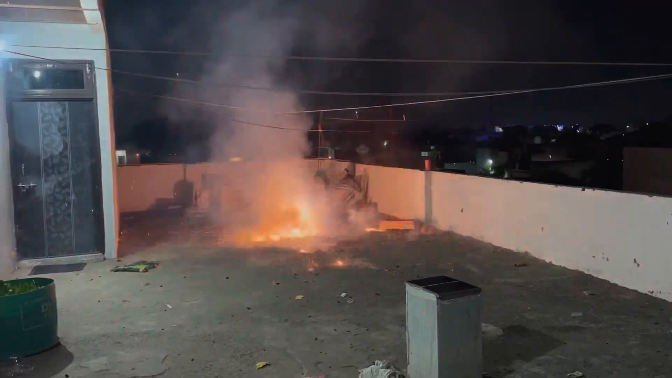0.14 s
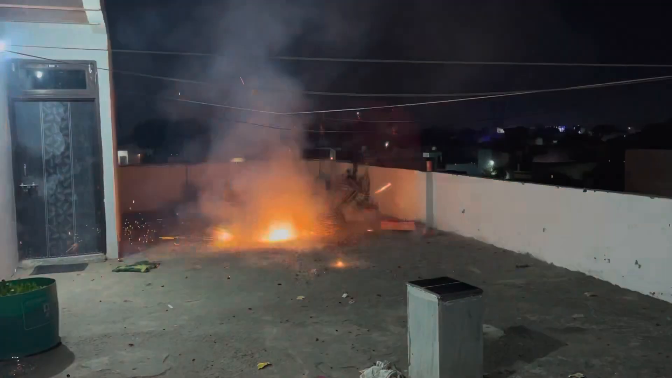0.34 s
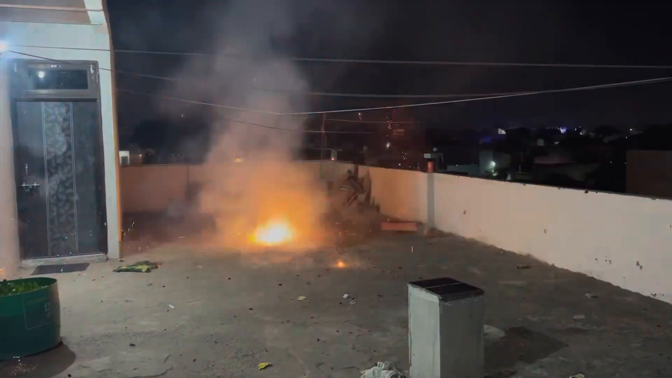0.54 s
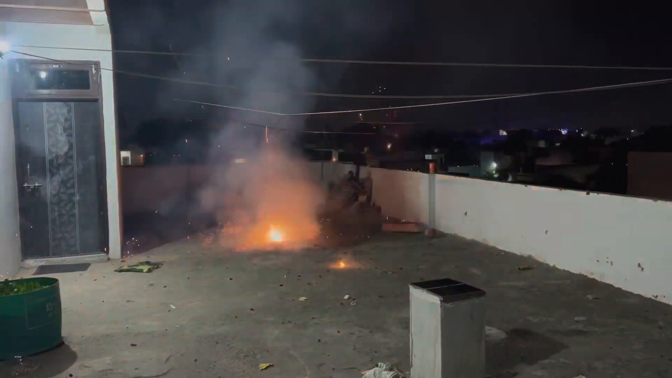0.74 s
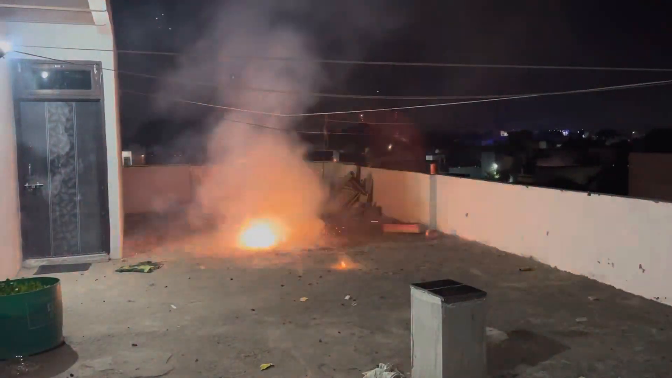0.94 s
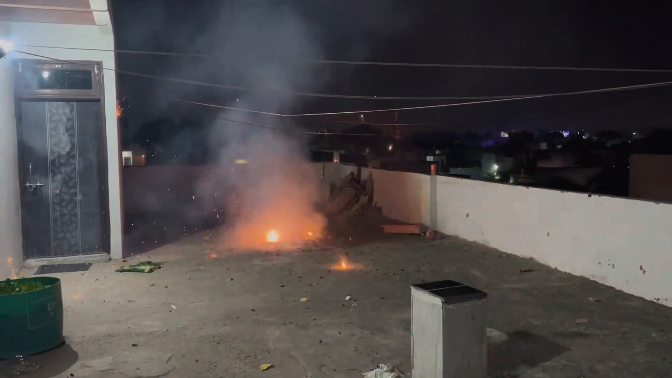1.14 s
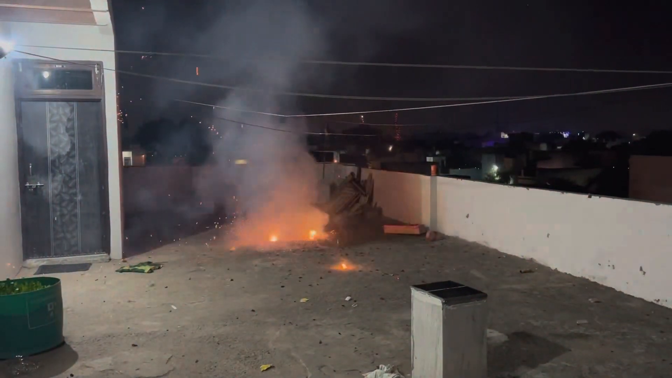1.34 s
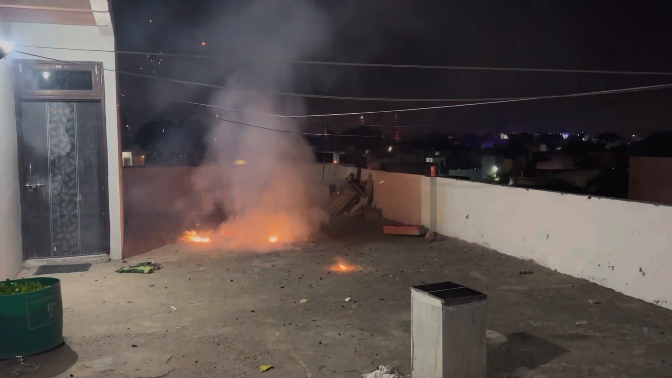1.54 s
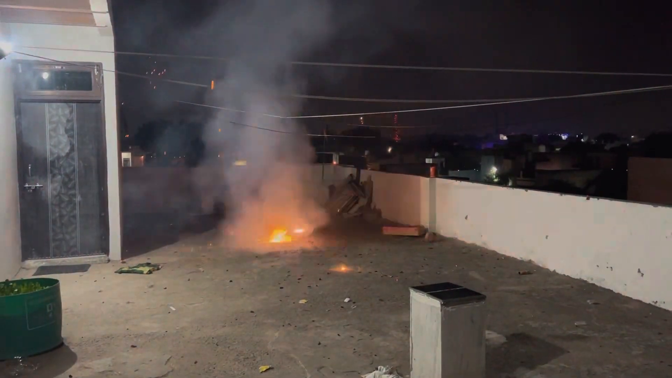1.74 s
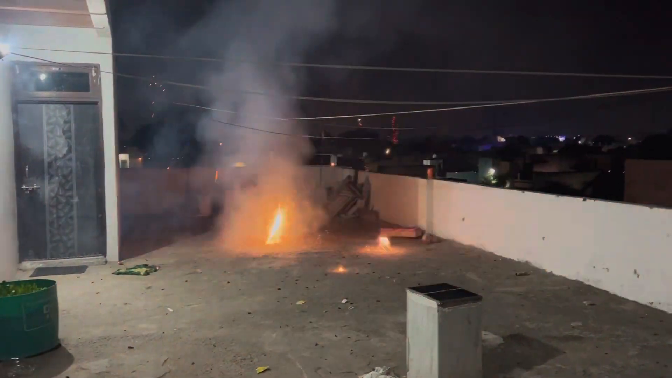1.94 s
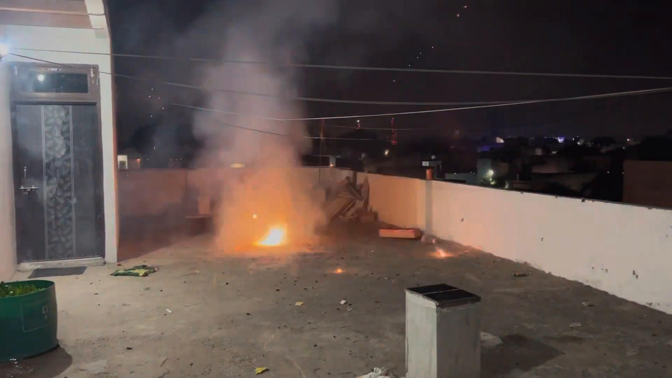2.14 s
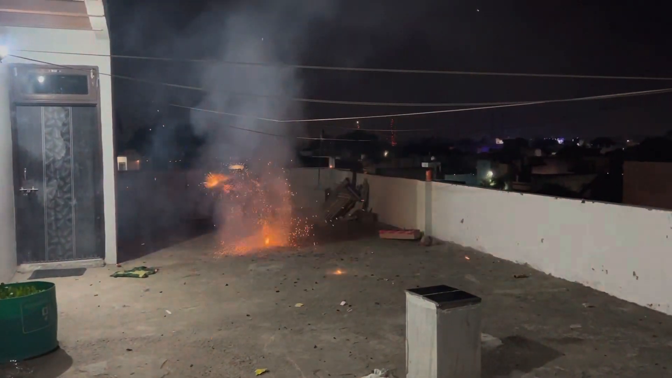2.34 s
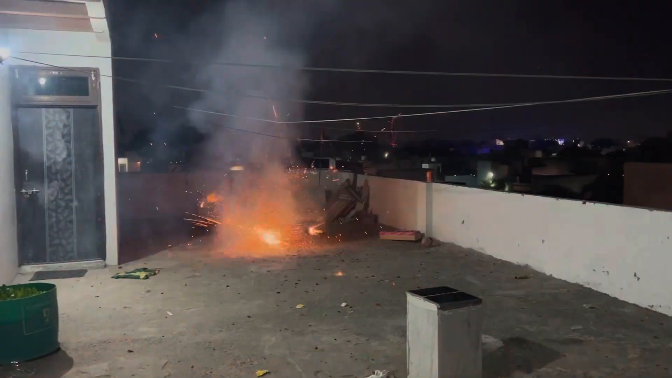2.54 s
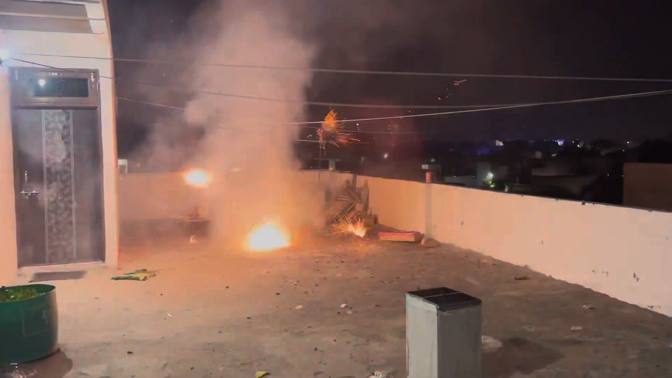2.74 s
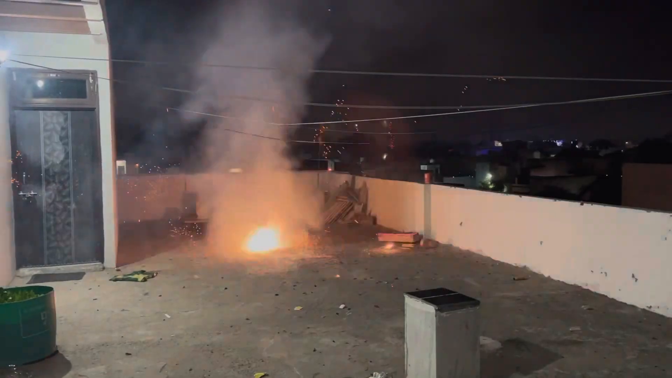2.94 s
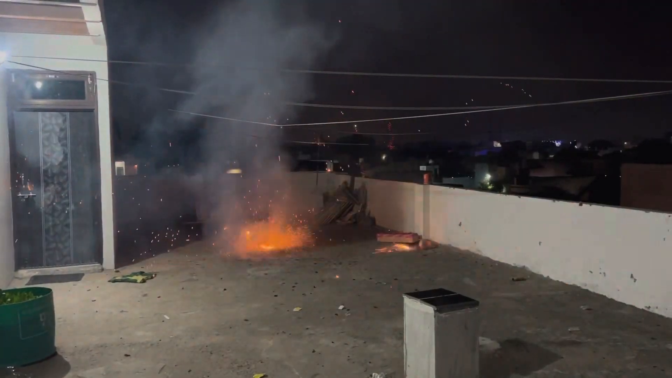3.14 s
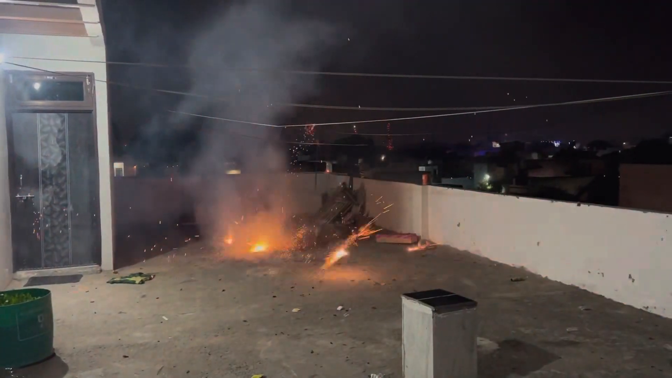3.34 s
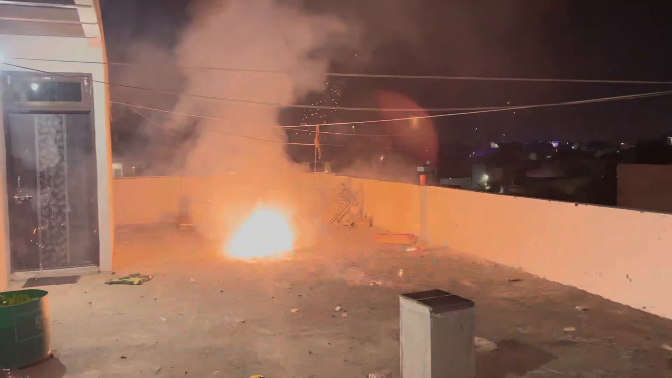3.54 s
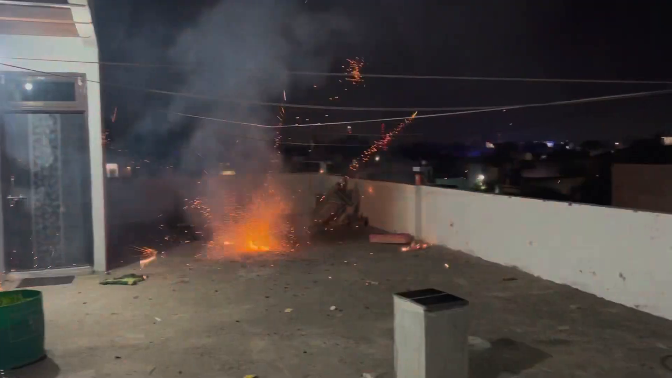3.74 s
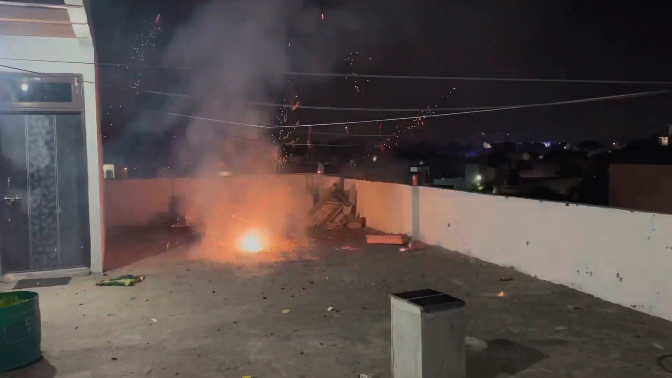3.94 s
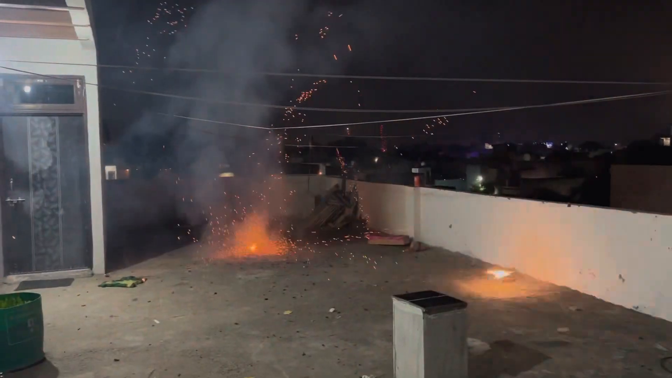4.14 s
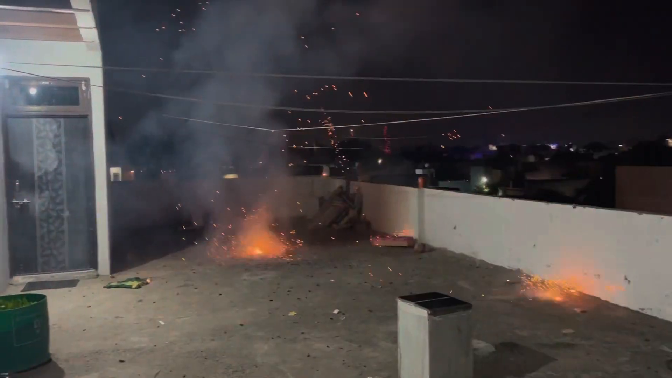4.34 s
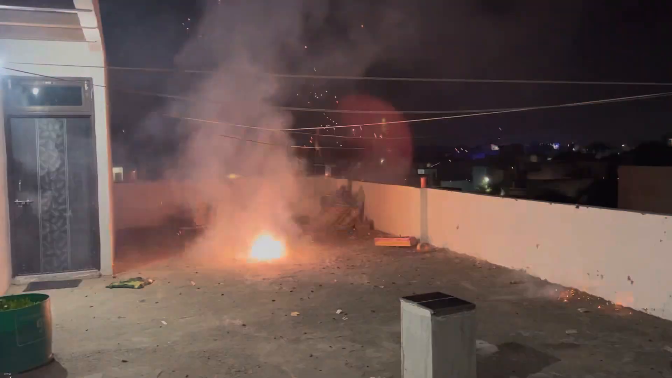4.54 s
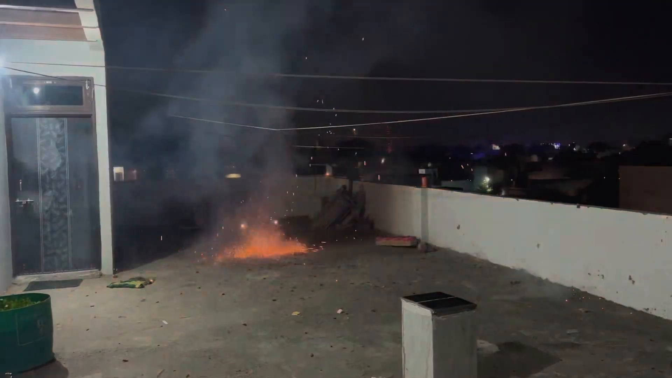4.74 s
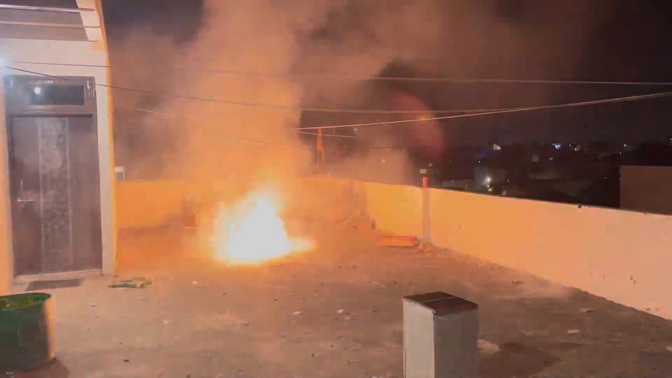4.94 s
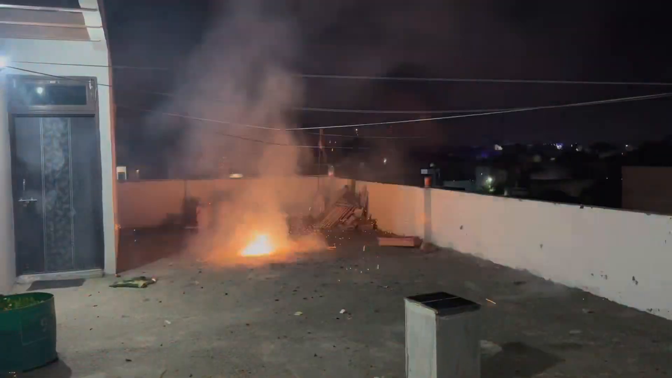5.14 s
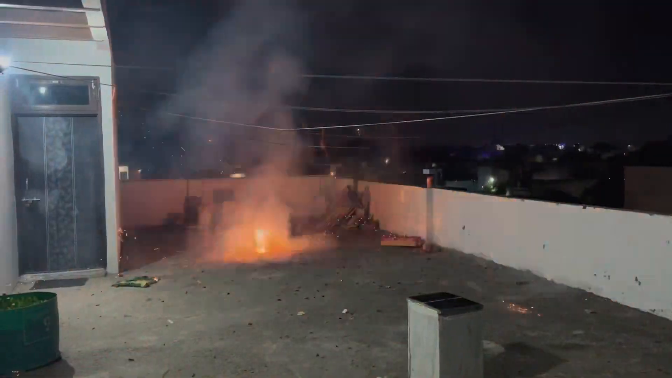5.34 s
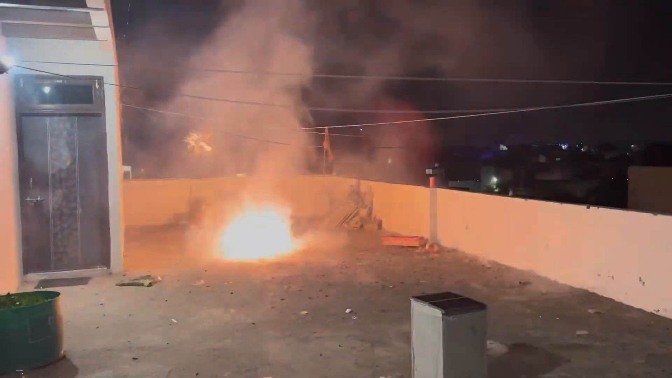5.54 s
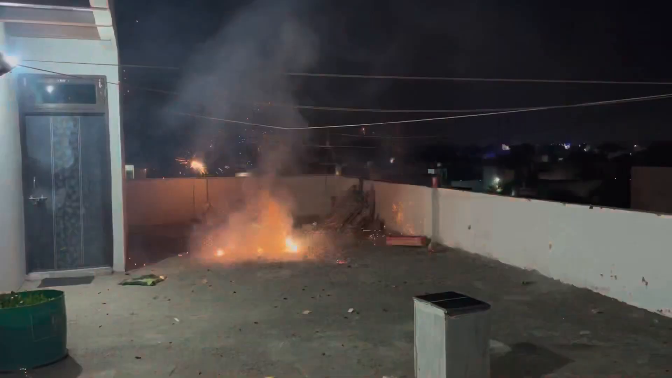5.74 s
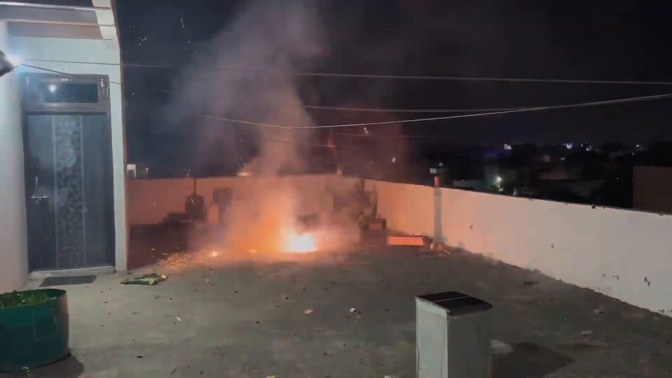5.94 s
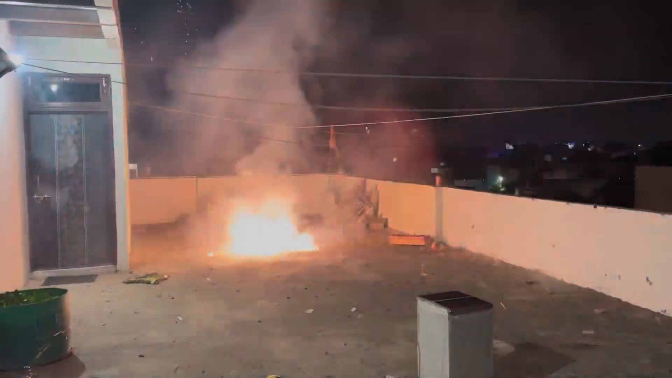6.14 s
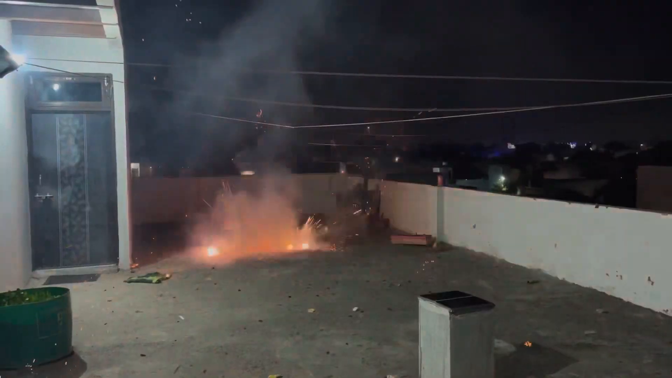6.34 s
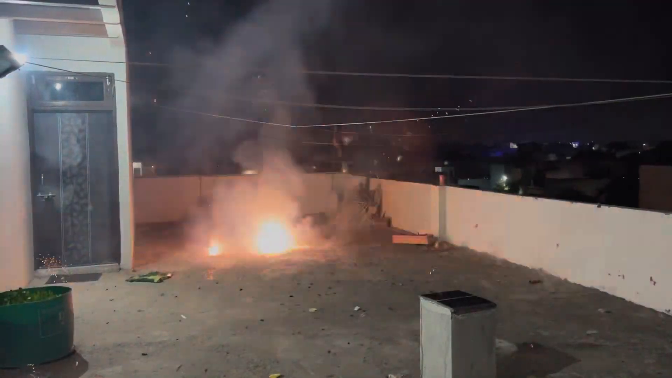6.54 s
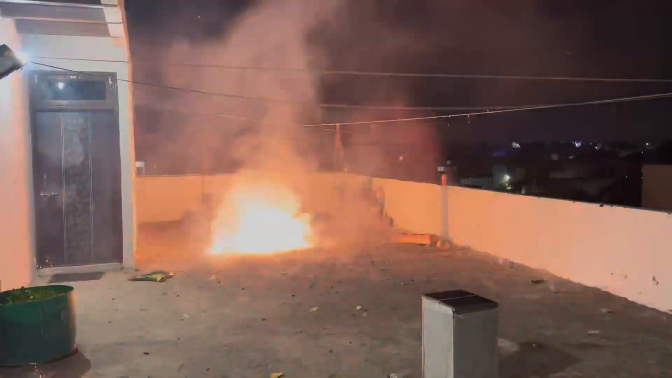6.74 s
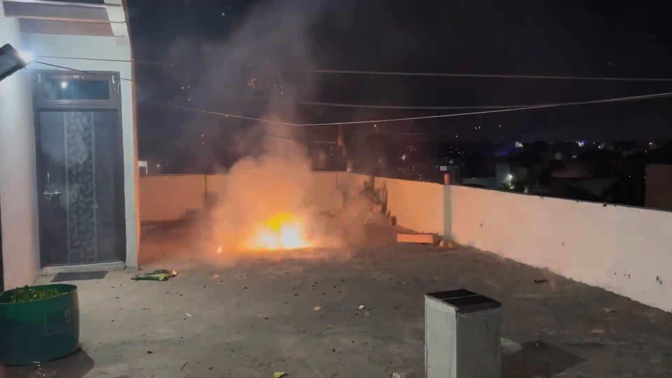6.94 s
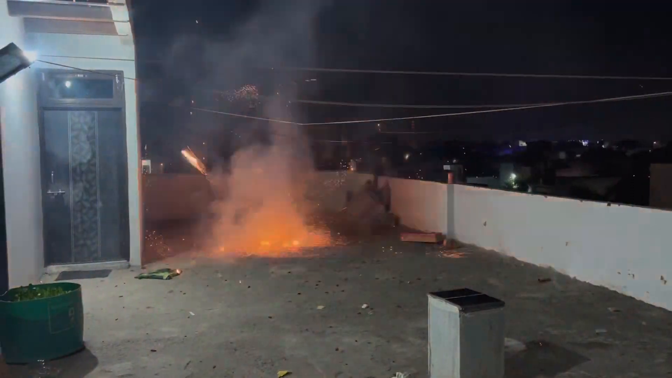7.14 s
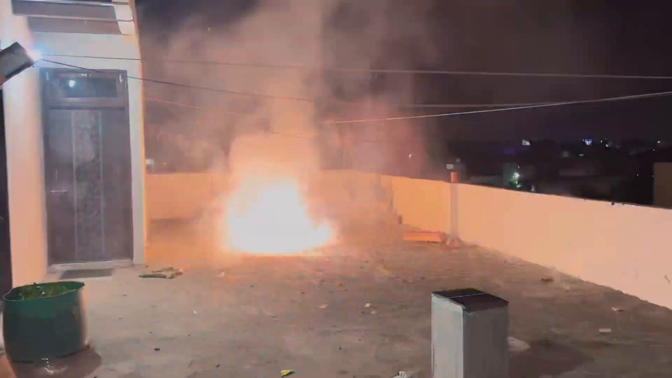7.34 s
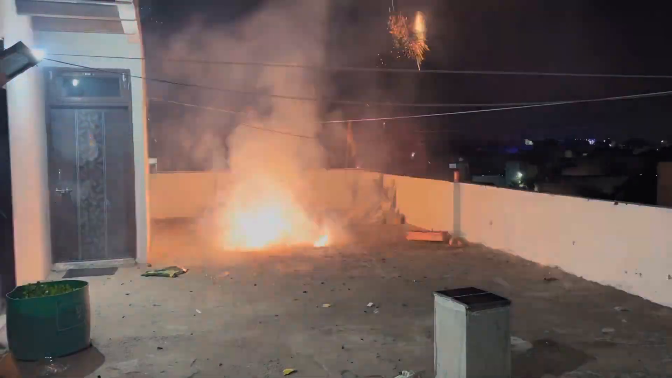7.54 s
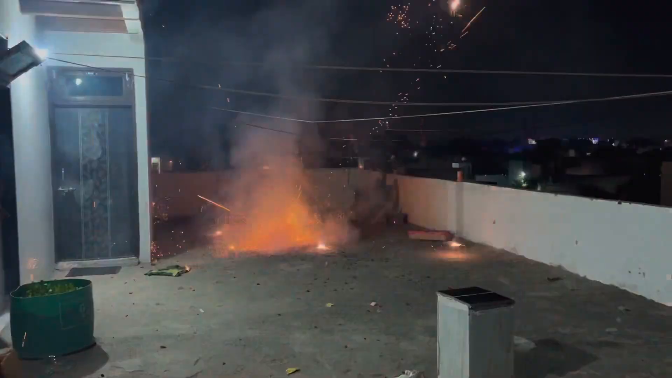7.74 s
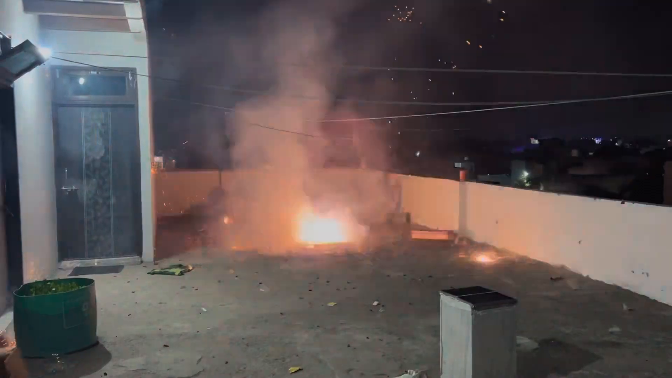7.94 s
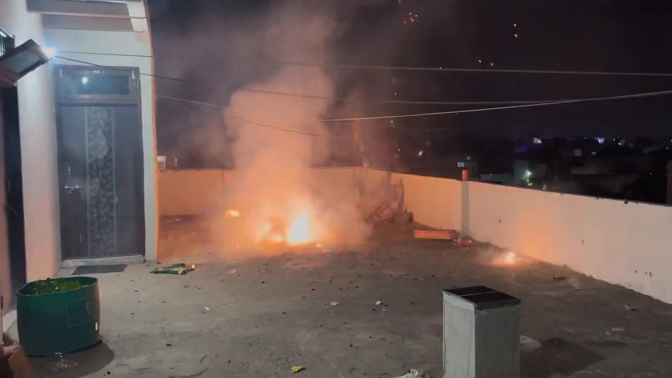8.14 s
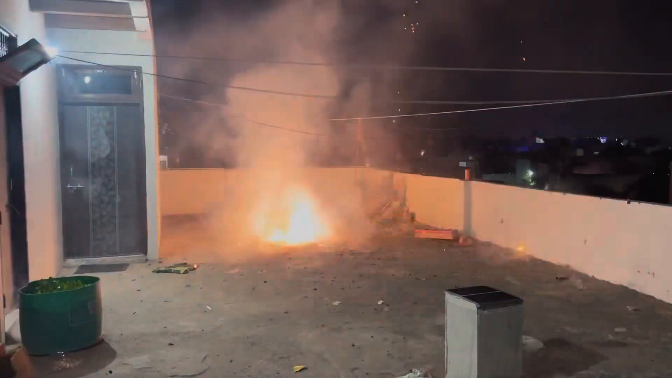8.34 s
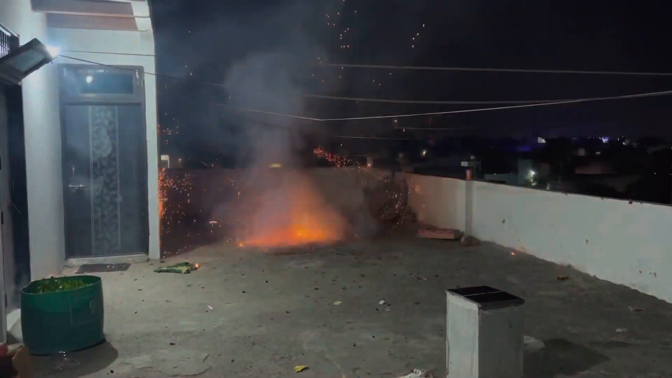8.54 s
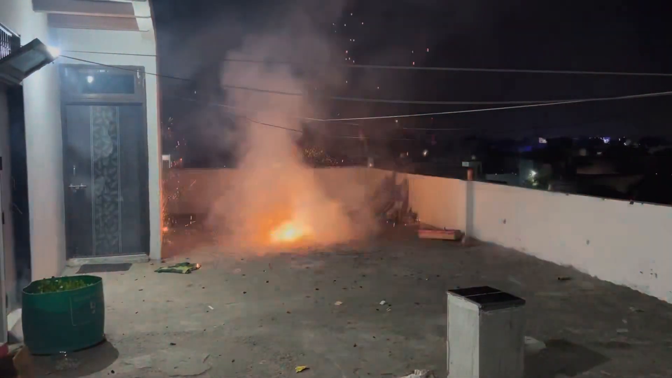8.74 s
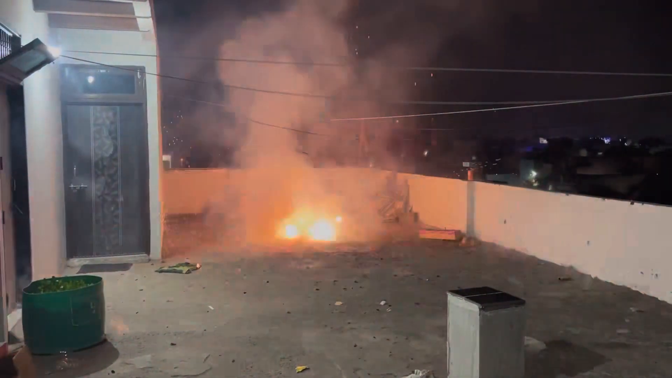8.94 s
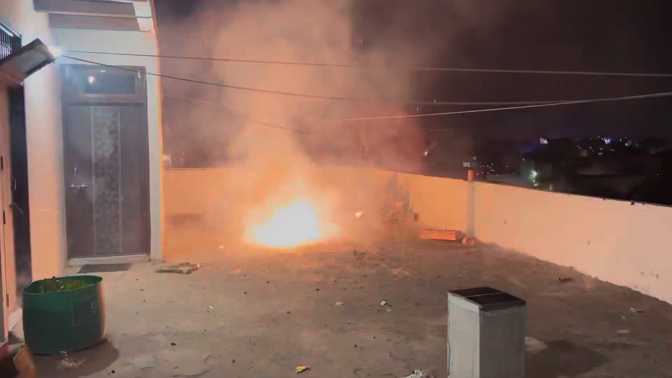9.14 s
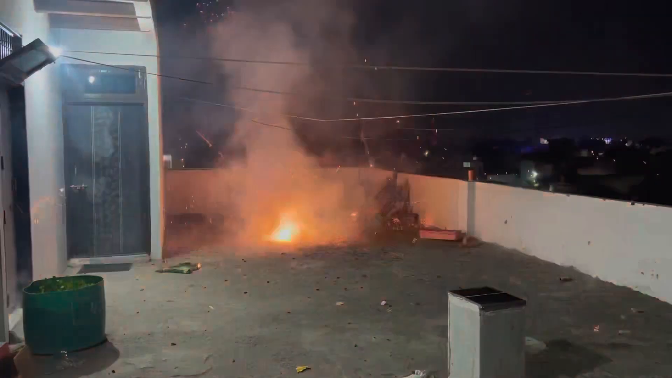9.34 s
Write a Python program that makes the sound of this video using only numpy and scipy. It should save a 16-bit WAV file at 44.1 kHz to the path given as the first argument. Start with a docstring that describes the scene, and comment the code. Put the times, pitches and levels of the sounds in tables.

```python
"""A thin whistle and the roll of earlier bangs, then a long string of firecrackers cracks away at night.
The place is a walled concrete roof terrace above a humming town, the microphone a phone some metres off.
Each blast is a sharp shock that slaps off the parapets, rings between the walls and rolls over the roofs.
Sparks sizzle after the bangs, and one cracker only fizzes.
The phone smears the bass into a quick downward thump and overloads on the loud bangs."""
import sys
import numpy as np
from scipy import signal
from scipy.fft import rfft, irfft, next_fast_len
from scipy.io import wavfile
from scipy.ndimage import uniform_filter1d, minimum_filter1d, map_coordinates

SR = 44100
rng = np.random.default_rng(int(sys.argv[2]) if len(sys.argv) > 2 else 0)


def store_pcm(level_fs):
    """Save levels as 16-bit WAV."""
    pcm = np.round(np.clip(level_fs, -1, 1) * 32767).astype(np.int16)
    wavfile.write(sys.argv[1], SR, np.atleast_2d(pcm).T)


N = 418068
SPAN = 32768  # samples in one bang with its ring
HZ = np.fft.rfftfreq(SPAN, 1 / SR)
AGE = np.arange(SPAN) / SR

# colour of the night air over the town: (frequency [Hz], level [dB])
TOWN_COLOUR = [(25, -30), (42, -2), (70, -1), (350, 7), (800, -9), (2500, -11), (6000, -22.5), (9500, -39),
               (13000, -23), (16000, -34)]
# colour of the sparks: (frequency [Hz], level [dB])
SPARK_COLOUR = [(300, -30), (2000, 13), (6000, 11), (9800, -10), (12500, 0), (16000, -14)]
# colour of flaring powder: (frequency [Hz], level [dB])
FIZZ_COLOUR = [(40, -15), (150, 16), (500, 3.5), (2500, -4), (6000, -8.0), (9800, -18.5),
               (12500, -11), (16000, -19)]
# colour of the ring between the walls: (frequency [Hz], level [dB])
RING_COLOUR = [(20, -14), (45, -10), (110, -0.5), (200, 0), (450, 9.5), (700, 4), (1100, 0.5), (2200, -2),
               (3500, -9), (5200, -11.5), (8000, -20.5), (14000, -27)]
# decay of that ring: (frequency [Hz], time to fall 60 dB [s])
RING_DECAY = [(50, 0.44), (170, 0.42), (380, 0.36), (900, 0.37), (3000, 0.33), (8000, 0.31), (15000, 0.3)]
# resonances of the terrace: (frequency [Hz], width [Hz], gain [dB])
TERRACE_MODES = [(188, 78, 7.5), (320.5, 10.5, 7.5), (385.2, 24, 7), (395, 44, 3)]
# first reflections, off the door wall and the parapets: (delay [s], level [dB])
WALL_SLAPS = [(.0023, -3.5), (.006, -1), (0.0107, -8)]
# peaks and dips that the nearby walls put into every blast: (frequency [Hz], width [Hz], gain [dB])
WALL_COMB = [(241.5, 71, 4.5), (742, 110, -3.5), (800, 89, 2.5), (1034, 200, 5.5), (1210, 66, 7.5),
             (1370, 130, -0.5), (1386, 30, 2), (2354, 52, 1), (2586, 175, -4.5)]
# colour of a blast: (frequency [Hz], level [dB])
BLAST_COLOUR = [(20, -28), (33, -4), (52, 13), (110, 9), (220, 11.5), (400, 9), (700, 2.5), (1300, -4),
                (2200, -4.5), (3500, -10), (5200, -18.5), (8000, -24.5), (14000, -26.5)]
# the crackers on the string, with boom, body and ring relative to the crack:
# (time [s], crack level [dB], boom [dB], hollow body [dB], terrace ring [dB])
CRACKERS = [(0.088, -29.5, -9, -9.5, -7), (0.196, -12, 1.0, -7, -2.5), (0.317, -17.0, 1, -2.0, -2.5),
            (0.346, -19.5, 2, 3.5, -10), (0.571, -38.5, 10, 8, -6), (0.612, -11, -20, -9.5, -5.0),
            (0.676, -23.5, 3, -3, -5.5), (0.708, -20, -15, -4.5, -9), (0.818, -28, -4, -6.5, 0),
            (0.896, -27.5, -15, -8.0, -4.0), (0.912, -20.5, -23, -5, -8), (0.941, -14.0, 7.5, 2.5, -5.5),
            (1.211, -27.5, 10, 4.5, -6.5), (1.731, -24, -3, -3.5, -10.5), (1.781, -27, 6, 1.5, -1.5),
            (1.856, -20, -3, -3.5, -7.5), (1.953, -30.0, 7, 8.5, -2.5), (2.072, -14.5, -11.0, -2, -5.5),
            (2.188, -19.5, -11, -8, -8), (2.214, -15.5, 6.5, 1.5, -3), (2.389, -14.5, -0.5, 1.5, 1.5),
            (2.537, -32, 8, 3.5, -0.5), (2.704, -26, -3, -5.5, -5.0), (2.741, -10.5, -2.5, -6, -4),
            (2.757, -14.0, -4, -1.5, -1.5), (2.852, -23, -5.0, 3, -8.5), (2.973, -16.0, -3, -10, -8.0),
            (3.1, -13.0, -0.5, -2, -8), (3.239, -11.0, 4, -3, -5.5), (3.38, -23.5, 2.5, 1.5, -5.5),
            (3.566, -13.0, 2.0, -6.5, 0.0), (3.66, -16, -0.5, -9, -1.5), (3.781, -9.5, -4.5, -7, -4.5),
            (3.907, -11.0, -5, -0.5, -5.5), (4.029, -12.5, -5, -3.5, -1), (4.051, -12.5, 14, -5.5, -6.5),
            (4.226, -16.0, -6.5, -13, -10.5), (4.271, -45, 5, -27, -2), (4.441, -12, 2, -3.5, -3.5),
            (4.496, -16.5, -17, 1, -4), (4.597, -16.5, 5, -5.5, -7.0), (4.626, -22.5, -20, -1, -6.5),
            (4.844, -12.5, 0, -5.5, -2.5), (4.977, -21.5, 9, -7.5, -6.0), (5.025, -12, -6, -2.5, -4.5),
            (5.051, -20, 10, -15, -3), (5.159, -17.0, -6.0, -2, -5), (5.2, -28, -5, 2.5, 6),
            (5.248, -17, 8, 4, -6), (5.301, -12, 3, -3, -4.5), (5.412, -29.5, -7.0, -5.0, -0.5),
            (5.442, -16.5, 1, -7.0, 0), (5.486, -11.5, 9, -5, -3.0), (5.533, -17.5, -2.0, -5.5, -7.5),
            (5.721, -17.5, -3.0, -5, -3.0), (5.794, -22.0, -14, -11, -1), (5.836, -14.5, 2.0, -0.5, -13.0),
            (5.85, -18.5, 5, -13, -4), (5.893, -17.0, 3, 1.0, -1), (5.944, -15, 5.5, -5.0, -5.5),
            (6.069, -12.5, 0.5, -3.5, -3), (6.199, -22.5, 11.5, 9, -5), (6.309, -21, 5, 7, -4.5),
            (6.405, -13, -2, -1.0, -2.5), (6.536, -16, -4.5, -4, -5.5), (6.67, -16, -5, -6, 0),
            (6.901, -20.5, 7, -1.0, 5.5), (6.92, -13.0, 3, 0, -16), (6.951, -21.5, 5.0, -4.5, 4.5),
            (6.984, -18, 9.0, -5.0, -1.5), (7.012, -18, 4, 5, -1.5), (7.045, -22.5, -16, -17, 4),
            (7.083, -19.5, 8, 4.5, 2), (7.188, -15, 2, -4.0, 1), (7.201, -14.5, 6.5, -10, -1),
            (7.229, -18.5, -11.0, -8.5, -3), (7.352, -30.0, -12, -5, -1.5), (7.393, -24.5, -8, 1, 3.5),
            (7.426, -29, 10, 12, -3), (7.564, -28.5, 3.0, 3, 2.0), (7.587, -25.0, 5, 7, 3.5),
            (7.702, -29.5, 23, 8, 4.5), (7.732, -16.5, 4.5, 0.5, -2), (7.833, -15, 2, -3.5, -1),
            (7.949, -20.0, -5, -8, -6.0), (8.006, -34.5, 8.0, 14, 4.5), (8.035, -21.5, 10, -1, 6.5),
            (8.305, -30.5, 10, 9.5, -1), (8.364, -25, 9, 3.5, 1.5), (8.396, -21, 9, -13, 0),
            (8.436, -16, 8, -2, -0.5), (8.512, -22, -2, -1.5, 4), (8.612, -16, 3.5, -2, 2.5),
            (8.664, -16.5, -5.0, 0.0, -7), (8.704, -10.5, 5.0, -8.5, -5.0), (8.776, -18.0, -8, -9, -9),
            (8.815, -26, 5, 7, -0.5), (8.946, -15.0, -13, -5.5, -7), (9.015, -13.5, -4, -4.5, -1),
            (9.161, -13.0, 8.0, -0.5, 0), (9.254, -18, 8, 1.5, 1), (9.295, -13.5, -1.0, -6.5, -1.5),
            (9.405, -17.5, -2, -5, -6)]
# stereo width at the phone's two microphones: (frequency [Hz], side over mid [dB])
MIC_WIDTH = [(40, -18), (150, -15.5), (300, -14.5), (550, -7), (1150, 4), (2000, -3.5), (4000, -3.5),
             (5500, 3), (7000, -9.5), (8700, -4.5), (10000, 52), (11200, -2), (12500, -24), (15000, 14)]
# balance of the two microphones: (frequency [Hz], left over right [dB])
MIC_BALANCE = [(130, 0), (280, -0.2), (520, 2), (1000, 0.5), (2500, 0.8), (9000, 0)]


def amp(db):
    """Decibels to gain."""
    return 10 ** (np.asarray(db) / 20)


def along(points, hz):
    """(Hz, value) points read on a log axis."""
    knots_hz, values = np.transpose(points)
    return np.interp(np.log(hz + 1), np.log(knots_hz + 1), values)


def bumps(peaks):
    """A dB curve over frequency made of (Hz, width, dB) peaks."""
    return sum(db / (1 + (2 * (HZ - hz) / width) ** 2) for hz, width, db in peaks)


def filtered(x, response):
    """Pass x through a frequency response."""
    size = next_fast_len(N + SR)
    return irfft(rfft(x, size) * response(np.fft.rfftfreq(size, 1 / SR)), size)[..., :N]


def levelled(gain):
    """Scale a colour so that unit white noise has rms 1 above 1 kHz."""
    return gain / np.sqrt(np.mean(gain ** 2 * (HZ > 1000)))


def add(track, time_s, sound):
    """Mix a sound into the track from time_s on."""
    start = int(round(time_s * SR))
    skip = max(0, -start)
    part = sound[..., skip:max(skip, N - start)]
    track[..., start + skip:start + skip + part.shape[-1]] += part


def wobble(rate, size):
    """A smooth random curve with `rate` knots a second."""
    knots = rng.standard_normal(int(size * rate / SR) + 4)
    return map_coordinates(knots, [np.arange(size) * rate / SR])


def hiss(colour):
    """Stereo noise of rms 1 with a given colour."""
    noise = rng.standard_normal((3, N))
    pair = filtered(noise[0] + .5 * noise[1:], lambda hz: amp(along(colour, hz)))
    return pair / pair.std()


def burst(life_s, channels):
    """Spectra of short noise bursts of unit energy."""
    t = AGE[:4096]
    noise = rng.standard_normal((channels, len(t))) * np.exp(-t / life_s) * (1 - np.exp(-4 * t / life_s))
    return rfft(noise / np.linalg.norm(noise, axis=1, keepdims=True), SPAN)


def mic_pair(pair, diffuse):
    """Left and right spectra: frontal sound differs in phase only, diffuse sound is partly unrelated."""
    width = amp(along(MIC_WIDTH, HZ))
    side = width * (1j * np.sqrt(1 - diffuse) * pair[0] + np.sqrt(diffuse) * pair[1])
    return np.array([pair[0] + side, pair[0] - side]) / np.sqrt(1 + width ** 2)


def town(hum_db=-54, lingering_db=-39, fade_db_per_s=28):
    """Far off, the town hums and the roll of earlier bangs fades."""
    lingering = amp(lingering_db - fade_db_per_s * np.arange(N) / SR)
    return (amp(hum_db) + lingering) * hiss(TOWN_COLOUR)


def street_rumble(bangs, db=-22, t60_s=1.4, centre_hz=56, width_hz=22, onset_s=.05):
    """The deepest part of each boom hangs over the streets for a while."""
    t = np.arange(2 * SR) / SR
    tail = rng.standard_normal(len(t)) * amp(-60 * t / t60_s) * (1 - np.exp(-t / onset_s))
    roll = signal.fftconvolve(bangs.mean(0), tail / np.linalg.norm(tail))[:N]
    return amp(db) * filtered(roll, lambda hz: 1 / (1 + ((hz - centre_hz) / width_hz) ** 4))


def rooftop_echo(bangs, db=-27, t60_s=2.8, dull_hz=1800, lumps_db=-7.0, onset_s=0.26):
    """Far houses send a dull, uneven roll back to the terrace."""
    t = np.arange(2 * SR) / SR
    noise = rng.standard_normal((3, len(t)))
    envelope = amp(lumps_db * wobble(26.5, len(t)) - 60 * t / t60_s) * (1 - np.exp(-t / onset_s))
    tail = (noise[0] + .5 * noise[1:]) * envelope
    roll = signal.fftconvolve(bangs.mean(0)[None], tail / np.linalg.norm(tail[0]), axes=1)[:, :N]
    return amp(db) * filtered(roll, lambda hz: hz / (hz + 70) / (1 + 1j * hz / dull_hz))


def sparks(ticks_per_s=2200, db=-60, spread_db=3, shower_db=6.5, shower_fade_s=0.18):
    """Every bang throws out a shower of sparks that thins out to a faint, steady sizzle."""
    ticks = (rng.random((2, N)) < ticks_per_s / SR) * rng.choice([-1, 1], (2, N))
    ticks = ticks * amp(spread_db * rng.standard_normal((2, N)))
    sizzle = filtered(ticks + .5 * ticks[::-1], lambda hz: amp(along(SPARK_COLOUR, hz)))
    time_s, crack_db = np.transpose(CRACKERS)[:2]
    thrown = np.bincount((time_s * SR).astype(int), amp(crack_db - crack_db.max()), N)
    shower = signal.lfilter([1], [1, -np.exp(-1 / (shower_fade_s * SR))], thrown)
    return amp(db) * np.sqrt(.5 + amp(shower_db) ** 2 * shower) * sizzle / sizzle.std()


def whistle(start_hz=3200, sag_hz=234, sag_s=0.23, waver_hz=40, db=-50.5, hold_s=0.65, fade_db_per_s=48):
    """Gas escaping from a burning tube sings thinly, wavers, and sags as the pressure falls."""
    t = np.arange(N) / SR
    pitch = start_hz - sag_hz * (1 - np.exp(-t / sag_s)) + waver_hz * wobble(260, N)
    flutter = 1 + 0.53 * np.array([wobble(170, N), wobble(130, N)])
    level = amp(db - fade_db_per_s * np.maximum(t - hold_s, 0))
    return level * flutter * np.sin(2 * np.pi * np.cumsum(pitch) / SR)


def fizz(peak_s=1.428, flare_db=-28, rise_db_per_s=720, fall_db_per_s=311, ember_db=-39.5, ember_s=0.14):
    """Powder flares out of a split tube without a bang, then burns out."""
    age = np.arange(N) / SR - peak_s
    rise = amp(rise_db_per_s * np.minimum(age, 0))
    after = np.maximum(age, 0)
    flare = amp(flare_db - fall_db_per_s * after)
    ember = amp(ember_db) * np.exp(-after / ember_s)
    return rise * np.maximum(flare, ember) * hiss(FIZZ_COLOUR)


def terrace_ring(colour, build_s=0.0029, ragged_db=1.5):
    """Sound rings raggedly between the walls around the microphone; each frequency has its own decay."""
    hz, t, bands = signal.stft(rng.standard_normal((2, SPAN)), SR, nperseg=256)
    decay = amp(-60 * t / along(RING_DECAY, hz)[:, None])
    tail = signal.istft(bands * decay, SR, nperseg=256)[1][:, :SPAN]
    swell = tail * (1 - np.exp(-AGE / build_s)) * amp(ragged_db * wobble(349.3, SPAN))
    return irfft(mic_pair(rfft(swell), diffuse=1.0) * levelled(colour))


def wall_slaps(wander_s=0.0002032, late_count=5, late_db=-10, late_fade_db_per_s=170, spread_db=0.94):
    """Spectrum of one blast's reflections off the door wall and the parapets."""
    delay, wall_db = np.transpose(WALL_SLAPS)
    # every cracker lies somewhere else, so the paths change, the long ones most
    delay = delay + wander_s * delay / delay[1] * rng.standard_normal(len(delay))
    # later slaps have bounced several times and come at chance moments
    late = rng.uniform(.014, .06, late_count)
    delay = np.r_[delay, late]
    wall_db = np.r_[wall_db, late_db - late_fade_db_per_s * late]
    sizes = amp(wall_db + rng.normal(0, spread_db, len(delay)))
    return rfft(np.bincount(np.abs(delay * SR).astype(int), sizes), SPAN)


def shock(tear_s=0.00033, roughness=0.76, rough_s=0.00042, scatter=0.82, scatter_s=0.01, wall_hz=260):
    """Spectra of one pressure jump with its tearing paper, wall slaps and scatter off the clutter."""
    treble = HZ / (HZ + 1500)
    jump = 1 + treble * burst(tear_s, channels=1)[0]
    slaps = wall_slaps()
    # rough plaster smears the treble of each slap
    plaster = np.array([[1], [0]]) + roughness * treble * burst(rough_s, channels=2)
    clutter = scatter * burst(scatter_s, channels=2)
    paths = (slaps * plaster + clutter) * HZ ** 2 / (HZ ** 2 + wall_hz ** 2)  # low walls: little bass
    paths[0] += 1 + 0.57 * treble  # the straight path keeps the sharpest edge
    pair = paths * jump
    return pair / np.sqrt(np.mean(np.abs(pair[0, HZ < 5000]) ** 2))


def neighbour_pops(chance=.13, crowd_s=.08, wait_s=(.018, .053), db=-7.5, spread_db=3, ring_db=-11):
    """Extra cracker rows: where the string burns fast, a bang may set off a weak neighbour."""
    bangs = np.array(CRACKERS, float)
    luck, wait, size = rng.random((len(bangs), 3)).T
    # soft count of the other crackers that go off at about the same time
    crowd = np.exp(-((bangs[:, :1] - bangs[:, 0]) / crowd_s) ** 2).sum(1) - 1
    pops = bangs.copy()
    pops[:, 0] += np.interp(wait, [0, 1], wait_s)
    pops[:, 1] += db + spread_db * (2 * size - 1)
    pops[:, -1] = ring_db  # such a pop hardly rings the terrace
    return pops[luck < chance * crowd]


def firecrackers(crack_lift_db=2.0, crack_s=0.012, edge_db=2, edge_spread_db=1.46, bearing_s=.00002):
    """Some metres off, each cracker is a shock of its own colour and direction that rings the terrace."""
    out = np.zeros((2, N))
    blast_colour = amp(along(BLAST_COLOUR, HZ) + bumps(WALL_COMB))
    ring_colour = amp(along(RING_COLOUR, HZ) + bumps(TERRACE_MODES) + .5 * bumps(WALL_COMB))
    # how much each frequency belongs to the boom, the body and the treble
    boom = along([(140, 0.98), (320, 0.053)], HZ)
    body = along([(650, 1), (1300, 0)], HZ) - boom
    treble = along([(1600, 0), (10000, 1)], HZ)
    snap_hz = np.geomspace(600, 12000, 18)
    crack_gain = amp(crack_lift_db) * np.sqrt(crack_s * SR)  # the energy of crack_s of noise
    lead = 4096  # samples of room ahead of each shock
    for time_s, db, boom_db, body_db, ring_db in np.vstack([CRACKERS, neighbour_pops()]):
        # a charge with more boom also has a slightly brighter edge
        treble_db = edge_db + 0.18 * boom_db + edge_spread_db * rng.standard_normal()
        # each tube splits in its own way, which puts chance peaks into its snap
        snap_db = np.interp(HZ, snap_hz, rng.standard_normal(len(snap_hz)), left=0)
        tint_db = body_db * body + treble_db * treble + snap_db
        mic_lag_s = bearing_s * rng.standard_normal()
        bearing = np.exp(2j * np.pi * HZ * mic_lag_s * np.array([[.5], [-.5]]))
        crack_colour = levelled(blast_colour * amp(tint_db + boom_db * boom))
        crack = irfft(bearing * mic_pair(shock(), diffuse=0.73) * crack_colour)
        # most of the boom escapes over the low walls instead of ringing
        ring = terrace_ring(ring_colour * amp(0.78 * tint_db + 0.52 * boom_db * boom))
        bang = amp(db) * (crack_gain * crack + amp(ring_db) * ring)
        add(out, time_s - lead / SR, np.roll(bang, lead, axis=1))
    return out


def scene():
    """The string of crackers on the terrace with its far echoes, over the quiet town."""
    bangs = firecrackers()
    return bangs + rooftop_echo(bangs) + street_rumble(bangs) + fizz() + whistle() + sparks() + town()


def microphone(hz, bass_delay_s=0.0302, knee_hz=90, latency_s=0.00083, edge_hz=14900):
    """The phone's response: the lower the frequency, the later it comes out; the very top fades."""
    delay = latency_s + bass_delay_s / (1 + (hz / knee_hz) ** 1.5)
    phase = -2 * np.pi * np.cumsum(delay) * hz[1]
    top_fade = 1 / np.sqrt(1 + (hz / edge_hz) ** 40)
    balance = amp(np.array([[.5], [-.5]]) * along(MIC_BALANCE, hz))
    return np.exp(1j * phase) * top_fade * balance


def record(dry, ceiling=2.4, hold_s=.002, hardness=7, bottom_hz=26, top_hz=16300):
    """In the phone a fast limiter ducks the loudest shocks, the rest clips, and both band ends are cut."""
    heard = filtered(dry, microphone)
    hold = int(hold_s * SR)
    duck = np.minimum(1, ceiling / (np.abs(heard).max(0) + 1e-9))
    limited = heard * uniform_filter1d(minimum_filter1d(duck, hold), hold)
    clipped = limited / (1 + np.abs(limited) ** hardness) ** (1 / hardness)
    low_cut = signal.sosfilt(signal.butter(2, bottom_hz, "high", fs=SR, output="sos"), clipped)
    return filtered(low_cut, lambda hz: 1 / (1 + (hz / top_hz) ** 120))


dry = scene()
out = record(dry)
store_pcm(out)
```